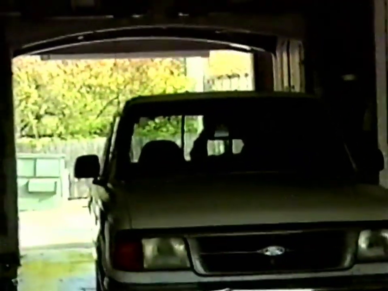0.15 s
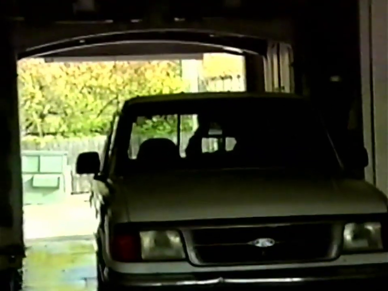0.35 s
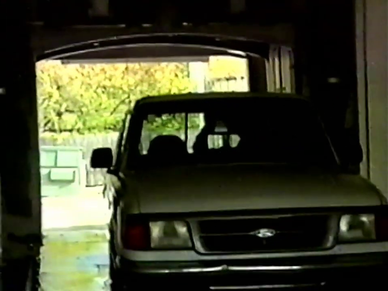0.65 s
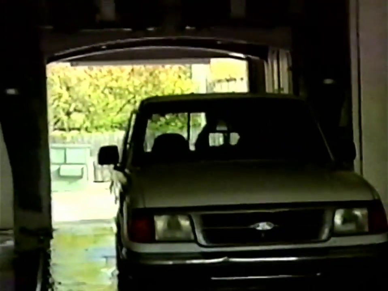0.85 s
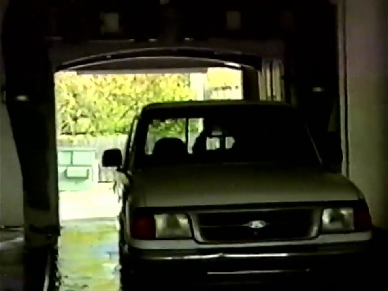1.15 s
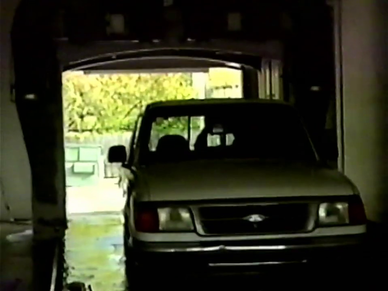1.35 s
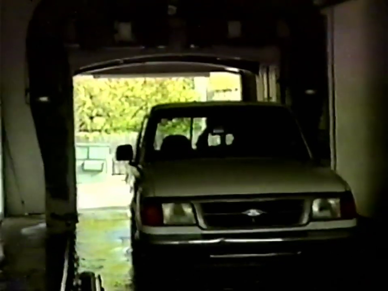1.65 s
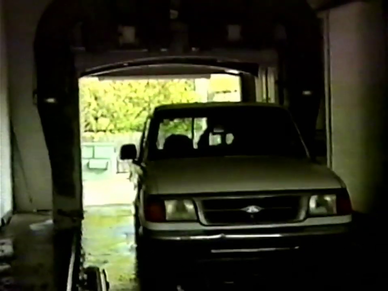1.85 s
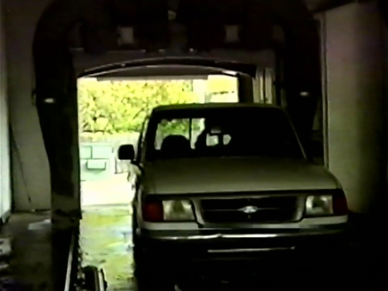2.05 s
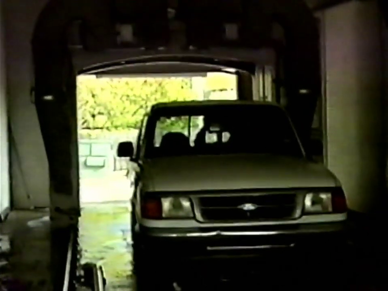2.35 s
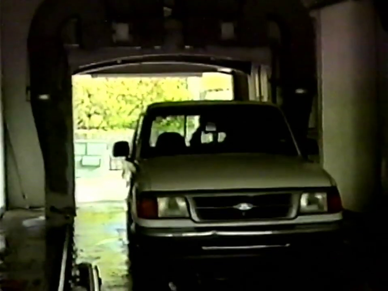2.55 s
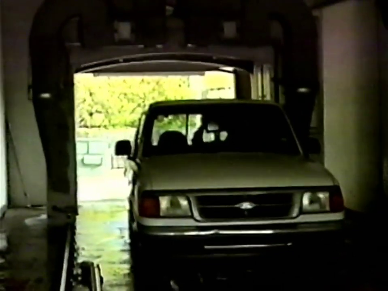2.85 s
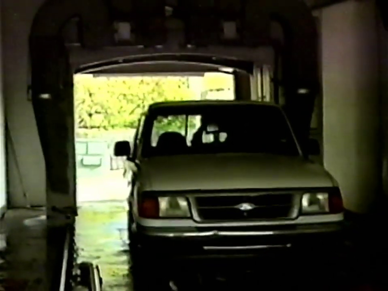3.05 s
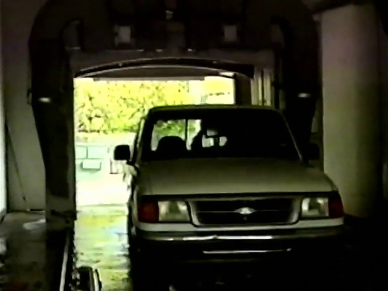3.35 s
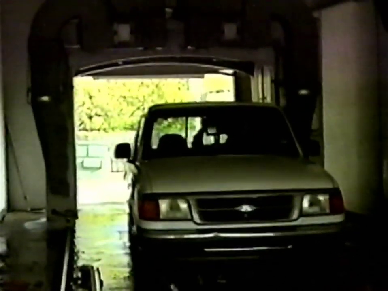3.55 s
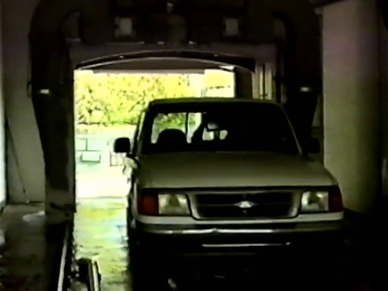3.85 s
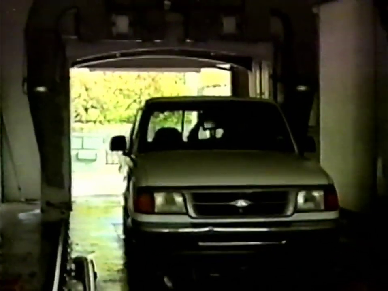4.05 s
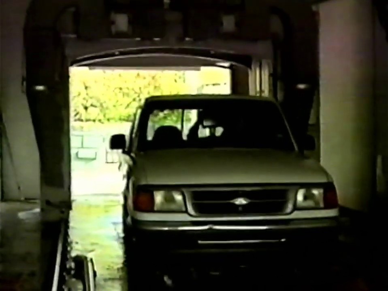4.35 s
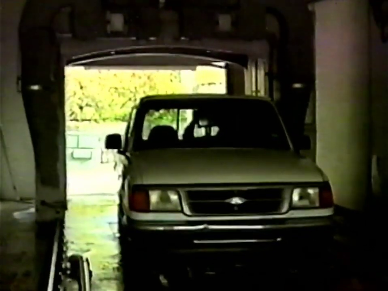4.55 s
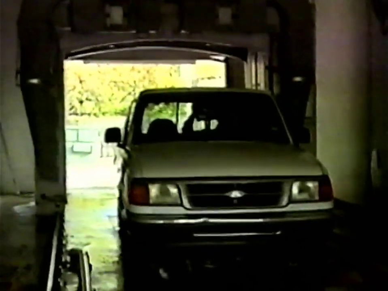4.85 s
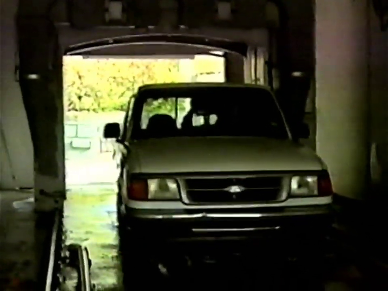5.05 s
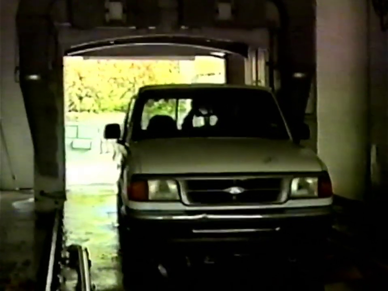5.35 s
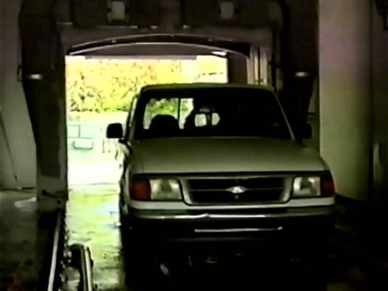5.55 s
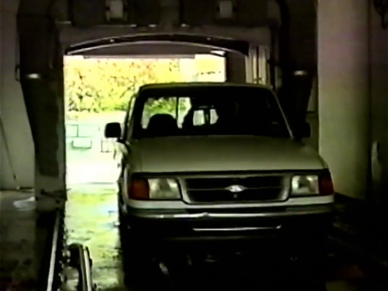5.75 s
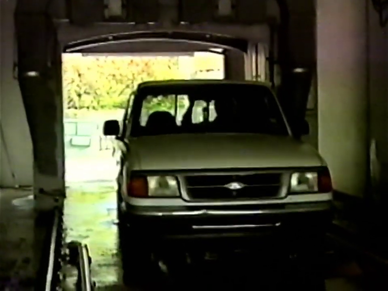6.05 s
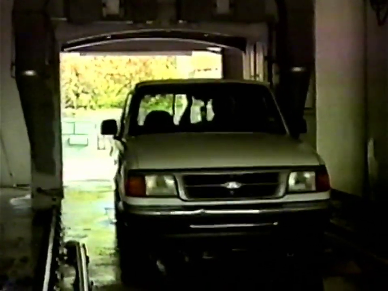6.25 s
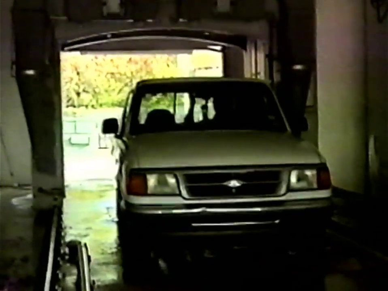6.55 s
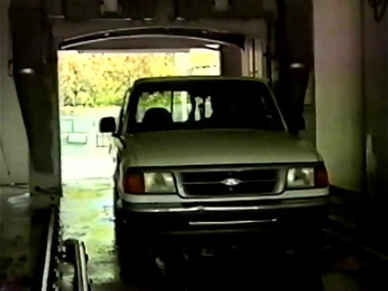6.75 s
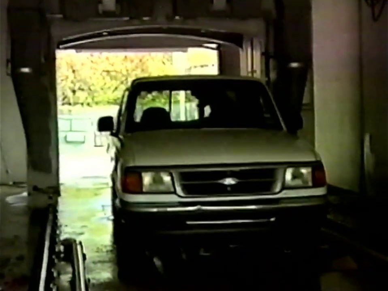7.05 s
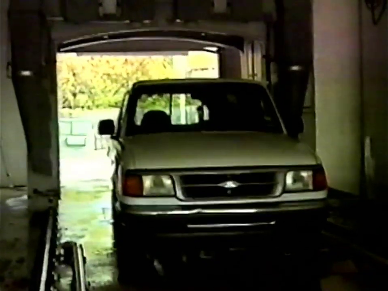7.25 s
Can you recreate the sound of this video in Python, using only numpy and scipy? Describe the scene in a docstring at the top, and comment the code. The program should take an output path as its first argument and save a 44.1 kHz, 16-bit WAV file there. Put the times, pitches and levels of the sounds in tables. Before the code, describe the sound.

Dense continuous air rush from wash-bay blowers around a waiting pickup, with one wavering tonal drone that repeatedly drops away and returns.

```python
"""Dryer blowers in a car wash bay

Air roars from the nozzles over a waiting pickup truck: shaped noise, plus ringing duct and bay resonances.
The nine-bladed impellers sing one note, a drifting sine that swells and fades in the hard-walled bay.
An old tape camcorder hears it through its gain control and adds hiss and a thin line-scan whistle."""
import sys
import numpy as np
from scipy import signal
from scipy.fft import rfft, irfft, next_fast_len
from scipy.io import wavfile
from scipy.ndimage import map_coordinates

SR = 44100
rng = np.random.default_rng(int(sys.argv[2]) if len(sys.argv) > 2 else 0)


def store_wav(level_fs):
    """Save 16-bit WAV to argv[1]."""
    pcm = np.round(np.clip(np.atleast_2d(level_fs), -1, 1) * 32767)
    wavfile.write(sys.argv[1], SR, pcm.T.astype(np.int16))


N = 326340  # length in samples


def amp(db):
    """Turn decibels into gain."""
    return 10 ** (np.asarray(db) / 20)


def unit(x):
    """Scale a signal to rms 1."""
    return x / np.sqrt(np.mean(x ** 2) + 1e-20)


def clock():
    """Give the time of every sample in seconds."""
    return np.arange(N) / SR


def curve(rows):
    """Join (time, value) rows by straight lines."""
    return np.interp(clock(), *np.transpose(rows))


def dipping(rows):
    """Hold a gain of one, with flat-bottomed dips at (time, half width, depth in dB) rows."""
    t = clock()
    dips_db = sum(depth_db * np.exp(-((t - middle) / half_width) ** 4)
                  for middle, half_width, depth_db in rows)
    return amp(dips_db)


def wobble(rate):
    """Draw a smooth random curve of rms 1 through `rate` random knots a second."""
    knots = rng.standard_normal(2048)
    return unit(map_coordinates(knots, [clock() * rate], mode="wrap"))


def sine(phase):
    """Make a sine of rms 1 from its phase in radians."""
    return np.sqrt(2) * np.sin(phase)


def scattered(phase, rate):
    """A tone of rms 1 that has come by many shifting paths: its strength and phase wander."""
    return unit(wobble(rate) * np.cos(phase) + wobble(rate) * np.sin(phase))


def filtered(x, response):
    """Multiply the spectrum of x by a response of frequency in Hz."""
    padded = next_fast_len(N + SR // 2)
    hz = np.fft.rfftfreq(padded, 1 / SR)
    return irfft(rfft(x, padded) * response(hz), padded)[:N]


def noise(colour):
    """Shape white noise to a (frequency, level) spectrum and scale it to rms 1."""
    f, db = np.transpose(colour)
    white = rng.standard_normal(N)
    return unit(filtered(white, lambda hz: amp(np.interp(np.log(hz + 1), np.log(f), db))))


# Swells of the blade note between its fades, ahead of the gain control: [t/s, level/dB]
NOTE_SWELLS = [(0, -37.5), (1.5, -29.5), (3.3, -28.5), (4.5, -34), (5.15, -27.5), (5.8, -35.5),
               (6.15, -27.5), (7.4, -34.5)]
# Fades of the blade note, which then returns: [t/s, half width/s, depth/dB]
NOTE_FADES = [(.62, 0.16, -12), (1.05, 0.049, -16), (1.26, 0.11, -12), (1.87, .11, -14), (2.39, 0.11, -15),
              (2.91, 0.096, -6.5), (3.46, .05, -15), (4.85, 0.1, -12.5), (5.59, .07, -6), (6.39, 0.17, -12),
              (7.24, 0.098, -14)]
# Hum of the unbalanced shafts, ahead of the gain control: [t/s, level/dB]
SHAFT_HUM = [(0, -65), (1.3, -67), (3.5, -77), (5.4, -66), (7.4, -66)]
# Impeller overtones, ahead of the gain control: [multiple of the shaft speed, level/dB]
SHAFT_ORDERS = [(1, -75), (2, -63), (3, -56), (4, -52.5), (6, -54.5), (7, -52.5), (18, -53), (27, -57),
                (36, -55.5), (45, -63), (54, -62), (72, -69.5)]
BLADES = 9
PITCH_HZ, WANDER_HZ, WANDER_PER_S = 523.1, 1.297, 4  # blade-pass pitch and its slow drift
FLUTTER_DB, FLUTTER_PER_S = 1.5, 16  # turbulence shakes the note's level
SECOND_HZ, SECOND_DB = 512, -46.5  # a slightly slower blower beats with the first
SMEAR_DB, SMEAR_PER_S = -45.5, 30  # the part of the note that the walls scatter


def impellers():
    """Blades chop the air once per pass, so the note and its shaft orders share one drifting phase."""
    pitch_hz = PITCH_HZ + WANDER_HZ * wobble(WANDER_PER_S)
    shaft_phase = 2 * np.pi * np.cumsum(pitch_hz / BLADES) / SR
    blade_phase = BLADES * shaft_phase

    level_db = curve(NOTE_SWELLS) + FLUTTER_DB * wobble(FLUTTER_PER_S)
    note = amp(level_db) * dipping(NOTE_FADES) * sine(blade_phase)
    second = amp(SECOND_DB) * scattered(2 * np.pi * SECOND_HZ * clock(), rate=3)
    smear = amp(SMEAR_DB) * scattered(blade_phase, SMEAR_PER_S)
    hum = amp(curve(SHAFT_HUM)) * sine(shaft_phase)
    overtones = sum(amp(db) * scattered(order * shaft_phase, rate=7) for order, db in SHAFT_ORDERS)
    return note + second + smear + hum + overtones


# Spectrum of the roar in the housings, relative: [f/Hz, level/dB]
ROAR_SPECTRUM = [(20, -27), (50, -30), (100, -21.5), (135, -11), (175, -5.5), (310, 1), (390, -1.5),
                 (500, 2), (620, -3.5), (780, -3.5), (1000, -19), (2000, -33.5), (5000, -72)]
# Resonances of ducts and bay, before the common trim: [f/Hz, width/Hz, level/dB]
RESONANCES = [(149.7, 6, -59.5), (204.7, 12, -52), (268, 12, -60), (295.3, 14, -46.5), (440.6, 30, -51.5),
              (545.4, 12, -46.5), (648.4, 8, -54), (1087, 160, -57)]
ROAR_DB, RINGS_TRIM_DB = -35.5, -0.46  # ahead of the air drift and the gain control


def ducts():
    """Turbulence roars in the housings and rings their resonances; a wider one wavers faster."""
    roar = amp(ROAR_DB) * noise(ROAR_SPECTRUM)
    rings = sum(amp(db) * scattered(2 * np.pi * hz * clock(), rate=width)
                for hz, width, db in RESONANCES)
    return roar + amp(RINGS_TRIM_DB) * rings


# Spectrum of the nozzle rush, relative: [f/Hz, level/dB]
JET_SPECTRUM = [(100, -45), (400, -1.5), (800, -1.5), (1100, 1.5), (1550, -2), (1800, -3.5), (2150, -3.5),
                (2900, -8), (3700, -10.5), (5000, -16), (5800, -21), (7000, -32.5), (8200, -48),
                (11000, -69.5)]
JETS_DB = -36  # ahead of the air drift and the gain control


def jets():
    """Air rushes from the nozzles as broad noise and flutters slightly in level over the truck."""
    flutter_db = 0.28 * wobble(24)
    return amp(JETS_DB + flutter_db) * noise(JET_SPECTRUM)


# Slow drift of the air flow: [t/s, level/dB]
AIR_DRIFT = [(0, .6), (1.3, 0.5), (3.5, -0.34), (4.4, -0.1), (5.8, .5), (6.4, -0.4), (7.4, -0.3)]
# Brief dips in the rush of air: [t/s, half width/s, depth/dB]
AIR_DIPS = [(4.587, 0.027, -8.5), (6.57, 0.045, -7.5)]


def moving_air():
    """Duct roar and nozzle rush share one air flow, so they drift and dip together."""
    return amp(curve(AIR_DRIFT)) * dipping(AIR_DIPS) * (ducts() + jets())


def scene():
    """Sum the blowers inside the bay; the note carries on through the dips of the air."""
    return (impellers() + moving_air())[None]


def gain_control(x, knee_db, slope, window_s):
    """Whatever swells above the knee turns the whole sound down, by `slope` dB per dB over."""
    keep = np.exp(-1 / (window_s * SR))
    power = signal.lfilter([1 - keep], [1, -keep], x ** 2)  # running mean power
    over_db = np.maximum(10 * np.log10(power + 1e-12) - knee_db, 0)
    return x * amp(-slope * over_db)


# Spectrum of the tape hiss, relative: [f/Hz, level/dB]
HISS_SPECTRUM = [(20, -3), (8000, 2.2), (11000, -0.5), (15500, -1)]
# Two close line-scan whistles that beat: [f/Hz, level/dB]
SCAN_WHISTLES = [(15733.4, -69.5), (15748.4, -76.5)]


def tape():
    """Tape hiss is steady shaped noise; the line scan whistles as two close sines that beat."""
    hiss = amp(-74) * noise(HISS_SPECTRUM)
    whistle = sum(amp(db) * sine(2 * np.pi * hz * clock()) for hz, db in SCAN_WHISTLES)
    return hiss + whistle


TOP_HZ = 15900  # nothing passes from here up


def record(dry):
    """The gain control ducks the air along with each swell of the note; then tape noise and band limit."""
    ducked = gain_control(dry[0], knee_db=-35, slope=0.44, window_s=0.019)
    return filtered(ducked + tape(), lambda hz: hz < TOP_HZ)[None]


dry = scene()
out = record(dry)
store_wav(out)
```